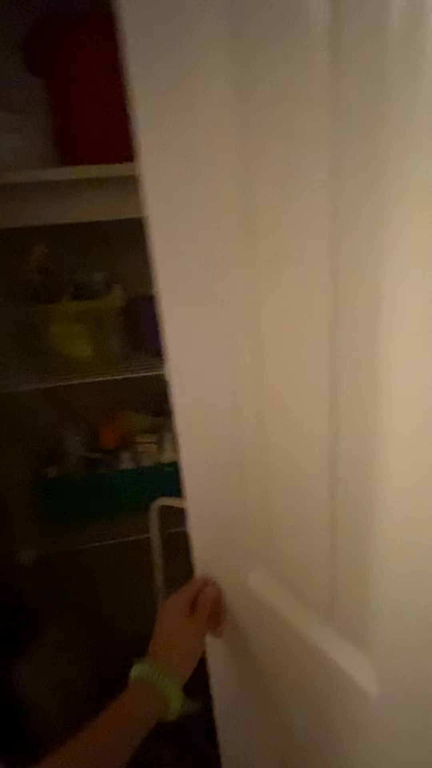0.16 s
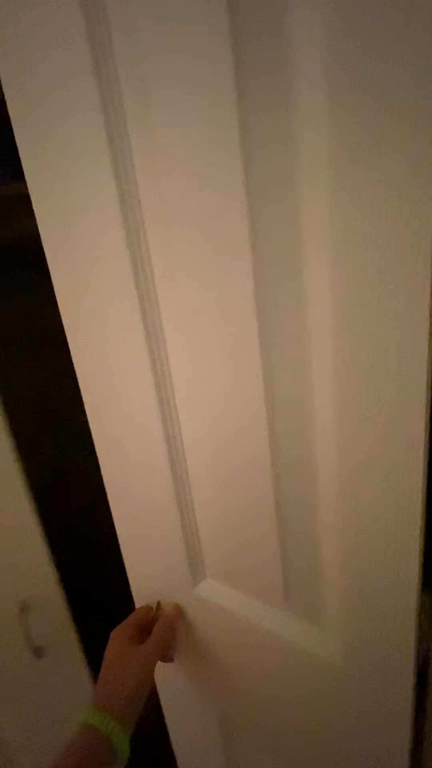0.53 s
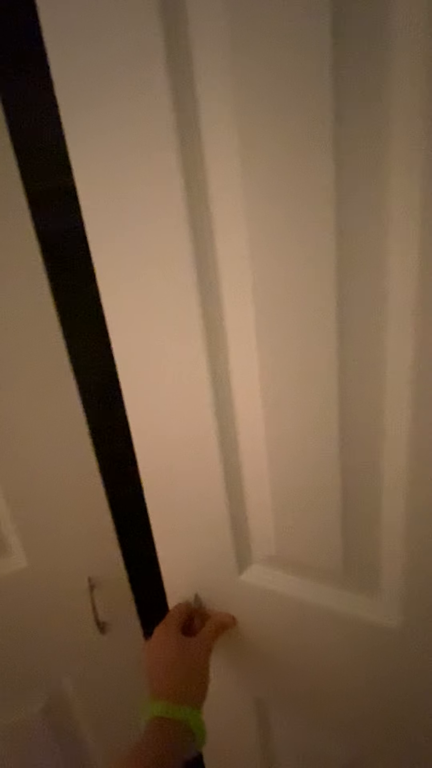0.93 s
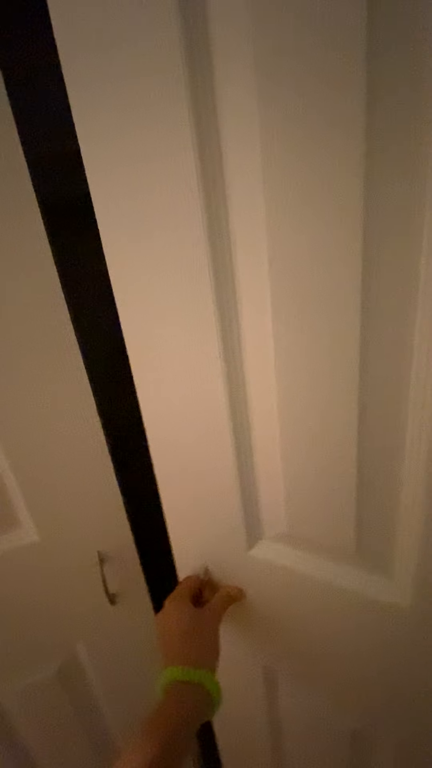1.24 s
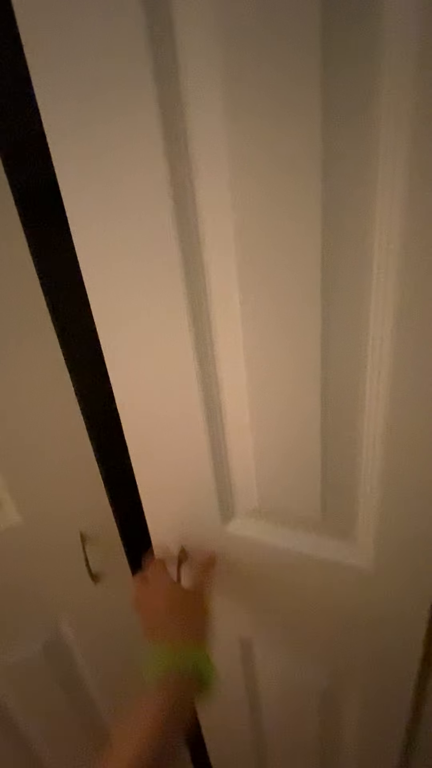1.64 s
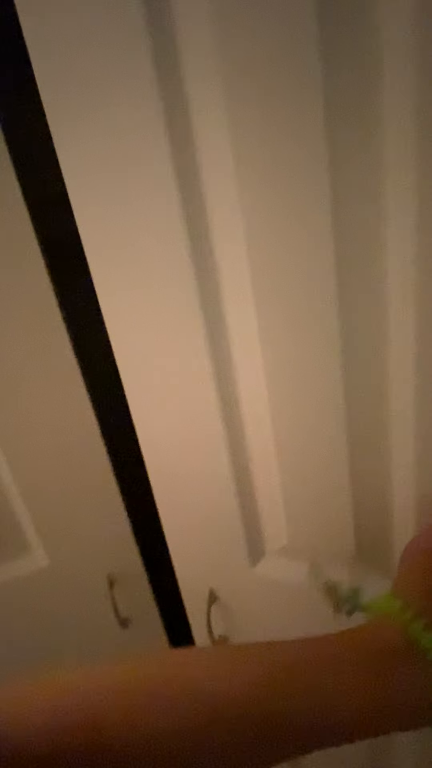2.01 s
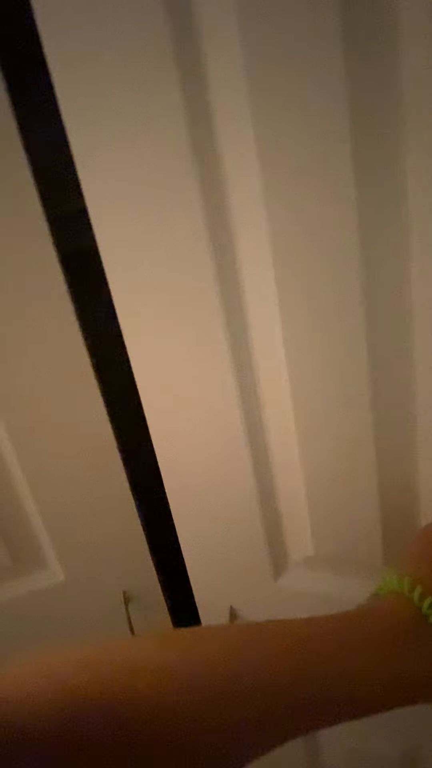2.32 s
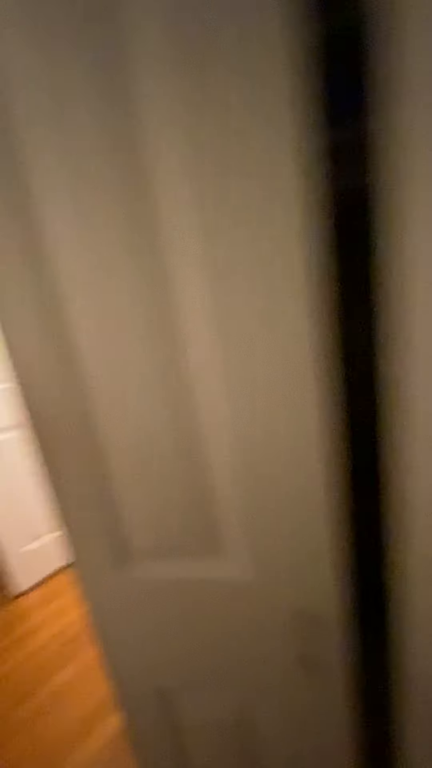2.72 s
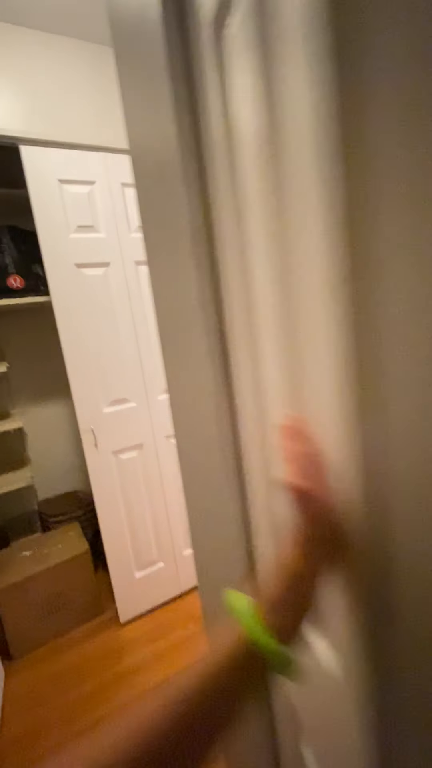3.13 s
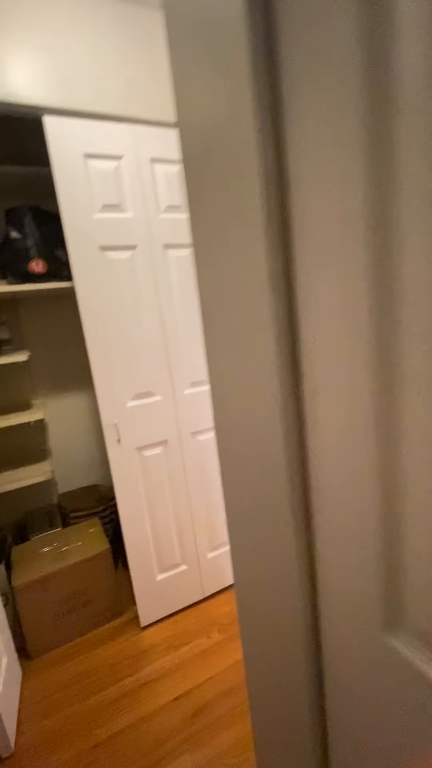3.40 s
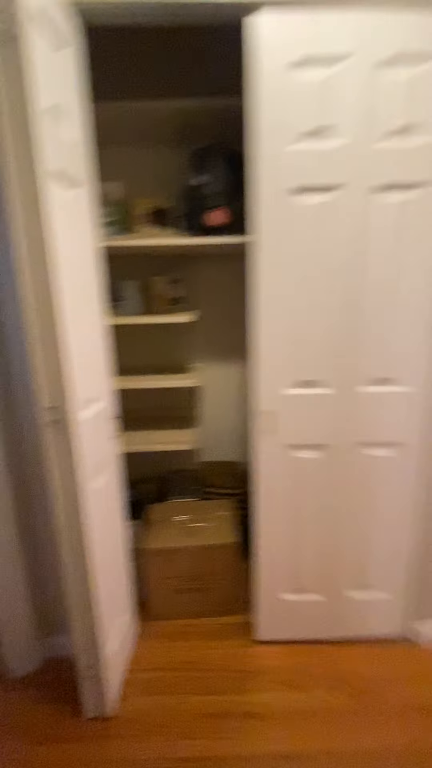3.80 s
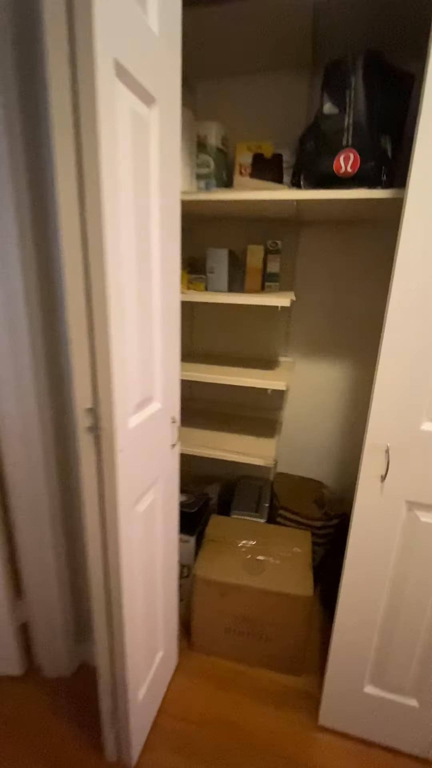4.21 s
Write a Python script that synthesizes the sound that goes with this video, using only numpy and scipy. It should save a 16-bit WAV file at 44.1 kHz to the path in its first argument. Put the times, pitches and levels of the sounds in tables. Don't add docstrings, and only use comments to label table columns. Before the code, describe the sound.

Hollow closet doors are nudged with light clicks and knocks, then swung with heavy booming rattles and a last dull double bump.

```python
import sys
import numpy as np
from scipy import signal
from scipy.fft import rfft, irfft, next_fast_len
from scipy.io import wavfile
from scipy.ndimage import uniform_filter1d, map_coordinates

SR = 44100
rng = np.random.default_rng(int(sys.argv[2]) if len(sys.argv) > 2 else 0)


def wrap_up_sound(samples):
    columns = np.atleast_2d(samples).T
    tamed = np.clip(columns, -1, 1)
    steps = np.round(tamed * 32767).astype(np.int16)
    wavfile.write(sys.argv[1], SR, steps)


def boost_factor(decibels):
    exponent = np.asarray(decibels, float) / 20
    return 10 ** exponent


N = 191923

# pitch_hz, level_db
ROOM_TONE = [(18, -46), (30, -9.5), (41, -8), (64, 4.5), (124, -10), (426, -21.5), (800, -23.5),
             (1250, -41), (2700, -29), (7670, -58), (12000, -61), (16500, -61)]
ROOM_TONE_DB = -54

# pitch_hz, width_hz, level_db
BOOM_MODES = [(39.3, 23.2, -7.5), (56.2, 19, 0), (82.4, 18.1, 1), (108.7, 40, -4.5)]
FLEX_MODES = [(130, 18, -12), (159, 9, 0)]
DRUM_MODES = [(208.2, 32.7, 0), (265, 34, 1), (307, 29, -3.5), (366, 18, -3.5), (425, 24, -6.5),
              (539, 31, -12), (600, 58, -11.5), (749, 54, -16.5), (857, 15, -17)]
# start_s, panel_weight_db, guide_speed_db
DOOR_TRAVEL = [(0, -36.5, -48), (.45, -44.5, -48.5), (.85, -36.5, -52), (1.0, -73, -65.5),
               (1.17, -86, -77.5), (1.6, -42.5, -66.5), (1.8, -36, -76), (2.16, -37, -53), (2.22, -22, -46),
               (2.5, -15.5, -63), (2.78, -37, -58), (2.9, -56, -57), (3.15, -36, -73), (3.44, -38.5, -61),
               (3.6, -21, -65), (3.85, -32.5, -54), (4.05, -63, -83), (4.35, -53.5, -70.5)]
# start_s, strength_db, bending_db, hardness_db
PANEL_SHOVES = [(.08, -35, 2, -15), (0.63, -49.5, -3, 12.5), (0.522, -45.5, 1.5, 3.5),
                (0.688, -28, -8, -16.5), (.74, -41.5, 4.5, 5), (0.901, -40, -1, -2.5),
                (1.015, -40, -1, 2.5), (1.233, -35, -15, 0), (1.435, -51, 7, 9.5), (1.658, -48, -6, 7.5),
                (1.781, -38, -14, -2), (1.942, -33.5, -10, -1), (2.07, -34, -1, -4.5),
                (2.212, -32.5, 1, 4.5), (2.3, -20.5, 5.5, -7), (2.369, -21.5, -6, -1.5),
                (2.49, -23, -8, -22), (2.59, -40, -27, -10), (2.679, -30, -13, -2),
                (2.807, -28.5, -3.5, -10.5), (2.901, -31.5, -12, -8), (2.989, -34, -6.5, -3.5),
                (3.149, -50, -1, -3), (3.5, -30, -9, 0), (3.546, -26, 2, -1.5), (3.588, -25, 7, -19),
                (3.651, -36, 0, -33), (3.758, -25, -10, -25), (3.848, -35, 11, -18), (3.919, -36, -28, -33)]
SHOVE_RISE_S = 0.035

# pitch_hz, density_db (per Hz)
SCRAPE_COLOUR = [(200, -30), (330, 11.5), (440, 13.5), (700, 2.5), (1200, -3.5), (1800, -10), (2500, -7),
                 (4000, -6), (6000, -3.5), (8000, -3.5), (10500, 8.5), (14000, -20.5), (16500, -10)]

# start_s, level_db (peak), pitch_hz
BOOM_LURCHES = [(0.053, -37, 69), (0.09, -32.5, 82), (0.298, -38.5, 76), (0.478, -41, 80),
                (0.556, -38, 87.5), (0.609, -33, 83.5), (0.653, -33.5, 82.8), (0.693, -28, 88.5),
                (0.748, -37, 78), (0.797, -33.5, 62.7), (0.854, -50, 71.4), (0.905, -40.6, 66.8),
                (1.031, -45, 74.8), (1.248, -29.5, 79), (1.331, -37, 71), (1.467, -50, 72),
                (1.697, -38, 65.6), (1.79, -33, 82), (1.85, -32.5, 79), (1.909, -31.5, 78.1),
                (1.969, -27, 77.6), (2.065, -25, 88), (2.102, -27, 88), (2.224, -19.5, 72.3),
                (2.268, -18.5, 77.5), (2.324, -15.5, 80), (2.368, -14.5, 59), (2.421, -13, 65),
                (2.491, -19.5, 68), (2.543, -18, 75), (2.597, -16, 76), (2.675, -19, 79),
                (2.738, -19.5, 63), (2.776, -24.5, 72), (2.815, -20.5, 68.3), (2.866, -31.5, 61.3),
                (2.946, -32, 71), (3.019, -34.5, 75.4), (3.151, -32.5, 67.5), (3.206, -40, 64.5),
                (3.355, -49, 72.4), (3.532, -18.5, 70), (3.594, -11.5, 77.6), (3.645, -14, 71.3),
                (3.76, -18, 70), (3.8, -27, 87), (3.914, -24, 66.7), (3.995, -34.8, 68.6)]
FLEX_LURCHES = [(0.041, -33.5, 128), (0.082, -38, 141.8), (0.336, -36.5, 155), (0.535, -36, 149),
                (0.615, -35.5, 149), (0.688, -33.5, 149), (0.746, -36.5, 163), (0.785, -33, 149.9),
                (0.818, -45, 165), (1.007, -45, 137), (1.243, -31, 157), (1.792, -32, 138),
                (1.831, -49, 169), (1.946, -23.5, 148), (1.978, -29, 156), (2.033, -42, 152.8),
                (2.07, -35, 129), (2.104, -32, 143.3), (2.191, -38, 158), (2.234, -23.5, 136),
                (2.266, -16.5, 152), (2.312, -25, 145), (2.381, -16.5, 150), (2.437, -12, 152),
                (2.492, -24, 139), (2.545, -17.4, 148), (2.603, -22, 144.0), (2.682, -24, 152),
                (2.735, -23, 140), (2.81, -31, 141), (2.911, -30, 147), (3.015, -46, 141.5),
                (3.151, -35.5, 154), (3.387, -36, 152), (3.423, -41.5, 148), (3.525, -24, 155),
                (3.556, -15, 153.5), (3.587, -16, 148), (3.648, -18, 157), (3.691, -18, 149),
                (3.732, -22.5, 153), (3.763, -20, 151), (3.84, -35, 155), (3.886, -28, 151)]
DRUM_LURCHES = [(0.337, -31.5, 260), (0.731, -40, 267), (0.915, -39, 247), (1.008, -31, 251),
                (1.23, -32.5, 263), (1.448, -33.5, 237), (1.832, -38, 255), (1.929, -41, 290),
                (1.98, -40, 233), (2.047, -35.5, 265), (2.198, -25.5, 292), (2.255, -17, 254),
                (2.305, -18.5, 238), (2.344, -33, 236), (2.383, -26, 247), (2.435, -28, 230),
                (2.489, -34, 230), (2.528, -29, 249.7), (2.595, -22.5, 245), (2.626, -31, 236),
                (2.661, -30, 258), (2.707, -24.5, 249), (2.747, -28.5, 240.8), (2.805, -23.5, 217),
                (2.909, -32.5, 291), (3.568, -31, 242.4), (3.661, -46, 265), (3.692, -35, 283),
                (3.756, -48, 246), (3.84, -34.5, 273)]
# start_s, level_db (peak), pitch_hz
FOLD_LURCHES = [
    (3.476, -33, 70),
    (3.509, -21, 64),
    (3.698, -16.5, 75.5),
]

# pitch_hz, density_db (per Hz)
CRACK_COLOUR = [(400, -59), (1000, -6.5), (1800, -15), (3000, -6.5), (4000, -4), (5000, -5.5), (6500, 1),
                (8000, 2), (10000, 15), (12000, -39)]
SPARKLE_COLOUR = [(8000, -34), (11000, 6.5), (13000, -10), (15000, -12), (16500, -29)]
# start_s, level_db (peak), sparkle_db, pitch_hz (metal ring)
EASING_CLACKS = [(.721, -38.5, -43, 2080), (.7728, -26, -35, 3910), (.865, -43, -24, 4460),
                 (.9872, -48.5, -50, 2490), (1.1947, -41.5, -38, 3280), (1.2202, -40, -35, 2620),
                 (1.367, -49.5, -34, 2390), (1.4142, -32.5, -23.5, 5660), (1.5125, -51, -49, 2550),
                 (1.5807, -54, -57, 2360), (1.694, -48.5, -25, 2600), (1.759, -65, -41, 2480),
                 (1.7765, -41, -30, 6400), (1.8, -38.5, -27, 2120), (1.822, -39, -27, 4100),
                 (2.0, -38, -14, 7500), (2.021, -33.5, -26, 2000), (2.0423, -31, -26.5, 2780),
                 (2.165, -46, -49, 2570)]
OPENING_CLACKS = [(2.197, -25.5, -24, 2830), (2.2283, -26, -26, 3600), (2.2826, -18, -22, 3660),
                  (2.3420, -24.5, -29, 5100), (2.4094, -19, -23.5, 3680), (2.5127, -22, -27, 3640),
                  (2.552, -27, -31.5, 3680), (2.6492, -20.5, -25.5, 3870), (2.6964, -27.5, -27, 4530),
                  (2.7799, -28.5, -23.5, 3830), (2.845, -35.5, -23, 3950), (2.93, -46, -16, 2660),
                  (2.9945, -33, -18, 5920), (3.022, -37.5, -20, 5760), (3.1148, -37, -29, 5770),
                  (3.1964, -38, -36, 3110), (3.25, -42.5, -31, 3010)]
FOLDING_CLACKS = [(3.4077, -42.5, -16, 3280), (3.4725, -37.5, -26, 3070), (3.5139, -30.5, -51, 3600),
                  (3.5668, -28.5, -29, 3080), (3.6294, -31.5, -43, 4350), (3.6721, -34, -46, 5000),
                  (3.7360, -32.5, -33, 3520), (3.7883, -37.5, -45, 3200), (3.8726, -48.5, -61, 4000),
                  (3.9806, -53, -26, 2810), (4.1954, -57.5, -36, 6500)]
# start_s, level_db, sparkle_db, pitch_hz
DRY_SNAPS = [
    (.241, -33, -24.5, 6000),
    (.7545, -29, -20, 6470),
    (.8595, -33, -20, 3900),
    (.8825, -34, -18.5, 4200),
    (3.5245, -31, -30, 1470),
    (2.8145, -33, -19, 6900),
    (3.0875, -33, -18, 7500),
]
# start_s, level_db, sparkle_db, pitch_hz
LOOSE_TICKS = [
    (.903, -57, -24, 3750),
    (.9492, -43, -31, 4200),
    (1.1385, -55, -24, 5640),
    (1.4155, -44, -14, 6400),
    (1.665, -45, -25, 5530),
    (1.9135, -48, -27, 5300),
    (1.9235, -37, -24, 5600),
    (3.617, -31.5, -27, 5030),
]
METAL_RING_T60 = 0.18

# start_s, length_s, level_db, pitch_hz
HINGE_SQUEAKS = [
    (0.271, 0.17, -54.5, 1332),
    (.33, 0.27, -54.5, 1220),
    (1.386, 0.042, -50, 1030),
    (1.511, 0.07, -50.5, 1013),
    (1.76, 0.066, -53, 2470),
    (2.022, 0.086, -41.5, 1370),
    (2.028, 0.11, -52, 2710),
    (2.032, 0.025, -44, 4390),
    (3.18, 0.077, -57, 3030),
    (3.225, 0.067, -51, 2980),
]

# start_s, level_db (peak), low_hz, high_hz, high_db
NUDGED_KNOCKS = [(.566, -29, 400, 1350, -9), (3.262, -41, 1034, 1400, 2), (.358, -27.5, 425, 1250, -21),
                 (.51, -39.5, 888, 1300, -19), (.693, -31.5, 366, 1040, 2), (.749, -33, 434, 996, -3),
                 (.884, -26.5, 398.4, 880, -4.5), (.998, -22, 385.4, 1000, -13.5),
                 (1.22, -30.5, 366.5, 1003, -6), (1.414, -24.5, 387, 600, -0.5), (1.667, -36, 398, 1096, 1),
                 (1.693, -34.5, 385, 1093, -5), (1.779, -29.5, 447, 1320, -1.5),
                 (1.826, -26.5, 366, 1386, -5.5), (1.923, -27.5, 342, 870, -14),
                 (2.022, -26.5, 628, 1160, -5), (2.043, -23, 405.4, 1055, -12)]
MOVING_KNOCKS = [(.563, -26.5, 703, 405, 3.5), (.884, -29, 600, 890, -7), (1.762, -38.5, 566, 875, 2),
                 (1.825, -31, 680, 1123, 5.5), (2.197, -29, 790, 1410, -5), (2.355, -19, 600, 960, -10),
                 (2.412, -23, 855, 1375, -1), (2.515, -25.5, 670, 1490, -13), (2.55, -33, 700, 1170, -15),
                 (2.652, -26.5, 728, 1520, -18), (3.445, -33, 800, 1695, 1), (2.193, -23, 428, 1320, -5.5),
                 (2.228, -25, 503, 1084, 0.5), (2.284, -17.5, 650, 1013, -1), (2.344, -23.5, 398, 1400, 4),
                 (2.41, -21.5, 517, 1010, -9), (2.462, -19.5, 427, 694, -2), (2.515, -19.5, 416, 1340, -10),
                 (2.649, -28, 362, 1260, -28), (2.899, -28.5, 386, 900, -23), (2.993, -35, 354, 1020, -25),
                 (3.446, -28.5, 494, 1030, -1.5), (3.49, -23, 370, 600, -11), (3.524, -22, 717, 1238, 3),
                 (3.568, -20.5, 535, 740, 4), (3.676, -24.5, 416, 1496, -2), (3.737, -31.5, 660, 1040, 6),
                 (3.788, -28.5, 583, 1090, -4)]
RESTING_KNOCKS = [
    (1.513, -51.5, 706, 1350, 5),
    (1.585, -47.5, 562, 1210, 6),
]
NUDGE_T60, SWING_T60 = 0.24, 0.11

# pitch_hz, level_db, t60_s
KEY_PARTIALS = [(5782, 3, .8), (7494, 1.5, .35), (11364, 8.5, .45), (13044, 5, .4)]
# start_s, level_db
LONG_KEY_TOUCHES = (0.5, -21, -6.5, -21), [(4.4, -55), (2.2, -69), (2.6, -48), (3.115, -45.5), (3.26, -72)]
ROUND_KEY_TOUCHES = (-19, 8, 4.5, -7), [(1.965, -63.5), (1.998, -56.5), (2.745, -50.5), (2.782, -44),
                     (2.813, -47), (2.93, -56.5), (2.993, -53.5), (4.068, -67), (4.128, -66.5)]
SMALL_KEY_TOUCHES = (-13, -3.5, 4.5, -9), [(1.859, -64), (1.93, -65), (2.861, -45.5), (2.9, -50),
                     (3.03, -55), (3.061, -57), (3.1, -63.5)]
THIN_KEY_TOUCHES = (-26, -13, -2, -5.5), [(1.82, -57), (1.99, -58), (2.1, -65), (3.12, -67), (3.26, -73),
                    (3.985, -66), (2.95, -63), (3.05, -58)]
KEY_CLINK_T60, KEY_RING = 0.063, 0.41

# pitch_hz, level_db
PORT_LOOSENESS = [(60, -30), (250, -21), (700, -4), (1400, -2), (3000, -1), (6000, -1), (8000, -5),
                  (10000, -16), (15000, -7)]
# pitch_hz, left_minus_right_db
PORT_LEAN = [(60, -1), (180, -2.4), (700, -1.5), (1400, 2.5), (2800, -2), (5500, -1.5), (9000, .4),
             (15000, 0)]
PORT_LAG = 49e-6
# pitch_hz, level_db
SHARED_RESPONSE = [(20, 0), (8200, 0), (9000, -9), (12000, -10), (12800, 0), (13600, 3), (15700, 3),
                   (15950, -30), (16800, -36), (17200, -90)]
# pitch_hz, level_db
DIFFERENCE_RESPONSE = [(3000, 0), (7000, -4), (10000, -9), (15800, -2), (16000, -90)]


def unit(x):
    return x / np.sqrt(np.mean(x ** 2) + 1e-20)


def steady(x, span):
    power = np.abs(uniform_filter1d(x ** 2, int(span * SR), axis=-1))
    return unit(x / np.sqrt(power + 1e-20))


def along(points, hz):
    f, v = np.transpose(points)
    return np.interp(np.log(hz + 1), np.log(f + 1), v)


def wobble(rate):
    knots = rng.standard_normal(int(N * rate / SR) + 4)
    return map_coordinates(knots, [np.arange(N) * rate / SR])


def filtered(x, response):
    n = x.shape[-1]
    m = next_fast_len(n + 8192)
    return irfft(rfft(x, m) * response(np.fft.rfftfreq(m, 1 / SR)), m)[..., :n]


def coloured(x, curve):
    return filtered(x, lambda f: boost_factor(along(curve, f)))


def resonances(modes):
    def response(f):
        total = 0
        for k, (hz, width, db) in enumerate(modes):
            damping = 1j * f * width
            total = total + (-1) ** k * boost_factor(db) * damping / (hz * hz - f * f + damping)
        return total
    return response


def jolts(per_second, scatter_db, smooth):
    size = boost_factor(scatter_db * rng.standard_normal((2, N))) * rng.standard_normal((2, N))
    sparse = (rng.random((2, N)) < per_second / SR) * np.clip(size, -2, 2)
    return unit(sparse) + smooth * rng.standard_normal((2, N))


def motion(column):
    rows = np.array(DOOR_TRAVEL)
    return np.interp(np.arange(N) / SR, rows[:, 0], rows[:, column])


def hush():
    return boost_factor(ROOM_TONE_DB) * unit(coloured(rng.standard_normal((2, N)), ROOM_TONE))


def shaking(travel_db, shove_db, t60):
    coarse = np.arange(0, N, SR // 1000)
    t = coarse / SR - np.array(PANEL_SHOVES)[:, :1]
    swell_db = np.where(t < 0, -20 * (t / SHOVE_RISE_S) ** 2, -60 * t / t60)
    shoved = boost_factor(2 * (shove_db[:, None] + swell_db)).sum(axis=0)
    return np.sqrt(boost_factor(2 * travel_db) + np.interp(np.arange(N), coarse, shoved))


def panels():
    boom = steady(filtered(jolts(400, 3.9, smooth=1.5), resonances(BOOM_MODES)), 0.033)
    flex = steady(filtered(jolts(150, 5.2, smooth=0.82), resonances(FLEX_MODES)), 0.042)
    drum = steady(filtered(jolts(300, 2.0, smooth=1.0), resonances(DRUM_MODES)), 0.051)
    weight = motion(column=1) + 40
    _, strength, bending, hardness = np.transpose(PANEL_SHOVES)
    boom_gain = shaking(weight - 42, strength, t60=0.66)
    flex_gain = shaking(1.136 * weight - 46.5, strength + bending, t60=0.29)
    drum_gain = shaking(0.84 * weight - 49.5, strength + hardness, t60=0.38)
    return boost_factor(-6.5) * boom * boom_gain + boost_factor(-5.5) * flex * flex_gain + boost_factor(-2.5) * drum * drum_gain


def scrape():
    rubbing = jolts(2500, 3, smooth=1.2) * boost_factor(1.1 * wobble(40))
    z = signal.stft(rubbing, nperseg=512)[2]
    patches = uniform_filter1d(rng.standard_normal(z.shape[1:]), size=6, axis=0)
    patches = uniform_filter1d(patches, size=10, axis=1)
    grit = signal.istft(z * boost_factor(2.5 * unit(patches)), nperseg=512)[1][:, :N]
    return boost_factor(motion(column=2) + 8.5) * unit(coloured(grit, SCRAPE_COLOUR))


def thumps(hits, rise_s, t60):
    out, t = np.zeros((2, N + 2 * SR)), np.arange(-SR // 10, SR // 4) / SR
    decay_db = -60 * t ** 2 / (t60 * (np.abs(t) + rise_s))
    swell = boost_factor(np.where(t < 0, -9 * (t / rise_s) ** 2, decay_db))
    phases = rng.uniform(0, 2 * np.pi, (len(hits), 2, 1))
    for (s, db, hz), phase in zip(hits, phases):
        swing = swell * np.sin(2 * np.pi * hz * t + phase)
        out[:, round(s * SR):][:, :len(t)] += boost_factor(db - 2.0) * swing
    return out[:, SR // 10:][:, :N]


def clacks(hits, t60):
    out, t = np.zeros((2, N + SR)), np.arange(SR // 3) / SR
    for s, db, sparkle_db, hz in hits:
        noise = rng.standard_normal((3, 2, len(t)))
        phase = 2 * np.pi * hz * t + 0.063 * np.cumsum(noise[2], axis=1)
        ring = 0.59 * boost_factor(-60 * t / METAL_RING_T60) * np.sin(phase)

        def crack_response(f):
            dull_db = 0.77 * (sparkle_db + 17.0) * np.clip(np.log2((f + 1) / 4500), 0, 2)
            body = 0.44 * np.abs(resonances([(hz, 500, 0)])(f))
            return boost_factor(along(CRACK_COLOUR, f) + dull_db) + body

        crack = unit(filtered(noise[0], crack_response))
        rattle_db = 1 * unit(uniform_filter1d(noise[2, 0], size=130))
        crack = unit(crack * boost_factor(rattle_db))
        sparkle = unit(coloured(noise[1], SPARKLE_COLOUR))
        fade = 0.19 * boost_factor(-60 * t / 0.11) + 0.55 * boost_factor(-60 * t / t60)
        fade = fade * (1 - np.exp(-t / 0.00031))
        snap = 3.1 * boost_factor(-60 * t / 0.015) + 2.52 * boost_factor(-60 * t / (0.71 * t60))
        snap = snap * (1 - np.exp(-t / 0.00021))
        hit = boost_factor(-2.5) * (crack + ring) * fade + boost_factor(sparkle_db + 10.0) * sparkle * snap
        out[:, round(s * SR):][:, :len(t)] += boost_factor(db) * hit
    return out[:, :N]


def squeaks():
    out, t = np.zeros((2, N + SR)), np.arange(SR // 3) / SR
    for s, length, db, hz in HINGE_SQUEAKS:
        waver = 0.065 * np.cumsum(rng.standard_normal((2, len(t))), axis=1)
        swell = np.sin(np.pi * np.clip(t / length, 0, 1) ** 0.56)
        out[:, round(s * SR):][:, :len(t)] += boost_factor(db) * swell * np.sin(2 * np.pi * hz * t + waver)
    return out[:, :N]


def knocks(hits, t60):
    out, t = np.zeros((2, N + SR)), np.arange(SR // 3) / SR
    for s, db, low_hz, high_hz, high_db in hits:
        noise = rng.standard_normal((2, 2, len(t)))
        low_modes = [(low_hz, 150, 0), (1.52 * low_hz, 200, -12)]
        low_rattle = unit(filtered(noise[0], resonances(low_modes)))
        high_rattle = unit(filtered(noise[1], resonances([(high_hz, 400, 0)])))
        low = np.sin(2 * np.pi * low_hz * t) + 0.5 * low_rattle
        high = 0.48 * np.sin(2 * np.pi * high_hz * t) + 0.5 * high_rattle
        high = boost_factor(high_db) * high * (0.52 + 1.05 * boost_factor(-60 * t / 0.027))
        fade = (1 - np.exp(-t / 0.0025)) * boost_factor(-60 * t / t60)
        out[:, round(s * SR):][:, :len(t)] += boost_factor(db - 5.5) * fade * (low + high)
    return out[:, :N]


def keys():
    out, t = np.zeros(N + SR), np.arange(SR // 2) / SR
    attack = 1 - np.exp(-t / 0.00033)
    for share, touches in (LONG_KEY_TOUCHES, ROUND_KEY_TOUCHES, SMALL_KEY_TOUCHES, THIN_KEY_TOUCHES):
        for s, db in touches:
            drift = 0.013 * np.cumsum(rng.standard_normal((len(KEY_PARTIALS), len(t))), axis=1)
            for (hz, level, t60), offset, phase in zip(KEY_PARTIALS, share, drift):
                ring = attack * np.sin(2 * np.pi * hz * t + phase)
                fade = boost_factor(-60 * t / KEY_CLINK_T60) + KEY_RING * boost_factor(-60 * t / t60)
                out[round(s * SR):][:len(t)] += boost_factor(db + level + offset) * fade * ring
    return np.array([out[:N], 0.17 * np.roll(out[:N], 37)])


def ports(shared, loose):
    sign = np.array([[1], [-1]])
    lead = filtered(np.array([shared, shared]), lambda f: np.exp(1j * np.pi * f * PORT_LAG * sign))
    apart = sign * coloured(loose, PORT_LOOSENESS)
    return filtered(lead + apart, lambda f: boost_factor(sign * along(PORT_LEAN, f) / 2))


def veiled(pair):
    mid = coloured(pair[0] + pair[1], SHARED_RESPONSE) / 2
    side = coloured(pair[0] - pair[1], DIFFERENCE_RESPONSE) / 2
    return np.array([mid + side, mid - side])


def scene():
    body = panels() + thumps([*BOOM_LURCHES, *FOLD_LURCHES], rise_s=0.017, t60=0.091)
    body = body + thumps(FLEX_LURCHES, rise_s=0.013, t60=0.072)
    body = body + thumps(DRUM_LURCHES, rise_s=0.0072, t60=0.072)
    metal = scrape() + squeaks() + clacks(DRY_SNAPS, t60=0.064) + clacks(LOOSE_TICKS, t60=0.079)
    metal = metal + clacks(EASING_CLACKS, t60=0.21) + clacks(OPENING_CLACKS, t60=0.24)
    metal = metal + clacks(FOLDING_CLACKS, t60=0.27)
    wood = knocks(NUDGED_KNOCKS, NUDGE_T60) + knocks(MOVING_KNOCKS, SWING_T60)
    wood = wood + knocks(RESTING_KNOCKS, NUDGE_T60)
    return veiled(ports(*(hush() + body + metal + wood))) + ports(*keys())


def top_cut(x):
    return signal.sosfilt(signal.butter(12, 16810, fs=SR, output="sos"), x)


def record(dry):
    return top_cut(dry)


dry = scene()
out = record(dry)
wrap_up_sound(out)
```